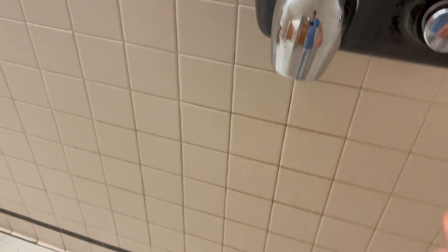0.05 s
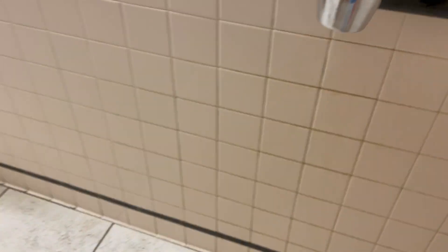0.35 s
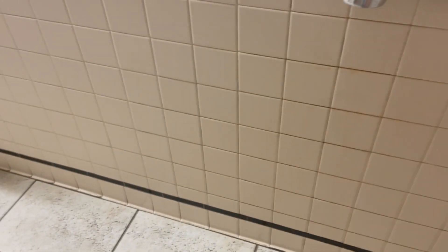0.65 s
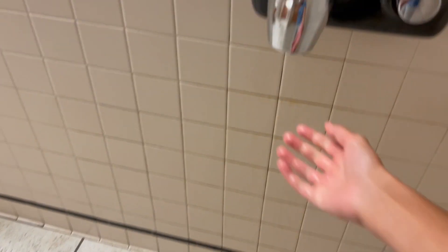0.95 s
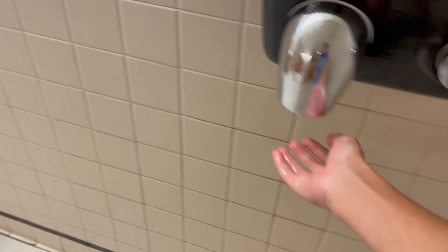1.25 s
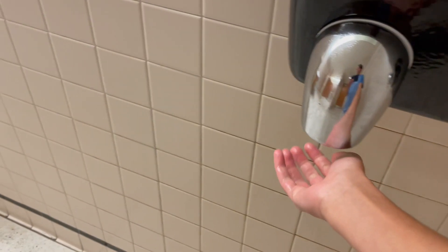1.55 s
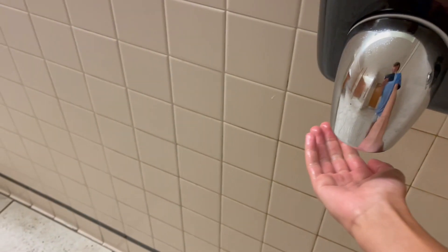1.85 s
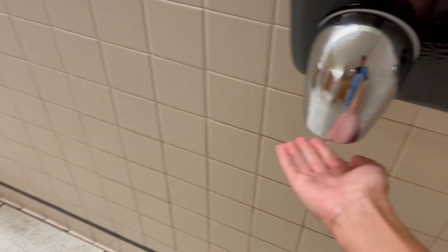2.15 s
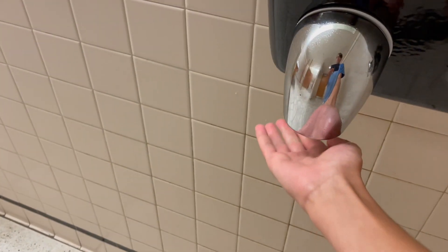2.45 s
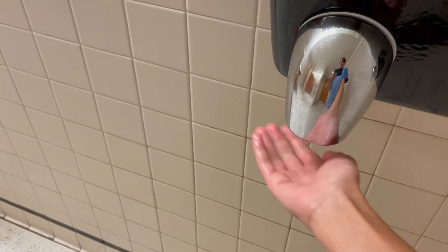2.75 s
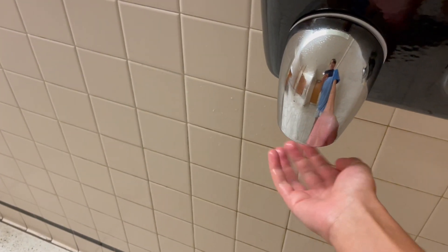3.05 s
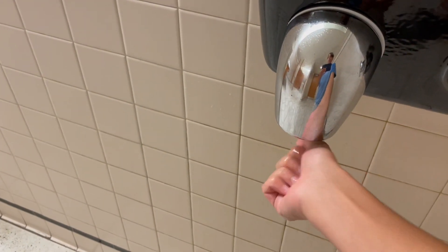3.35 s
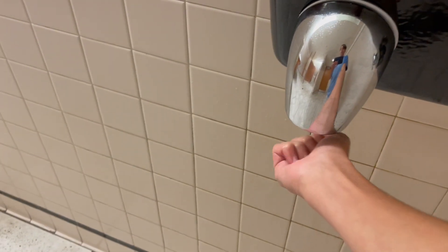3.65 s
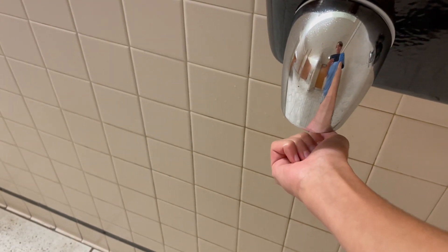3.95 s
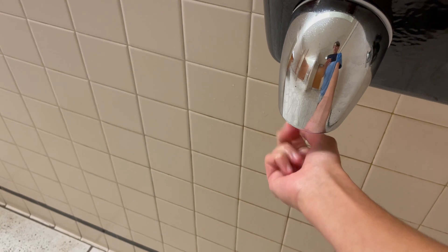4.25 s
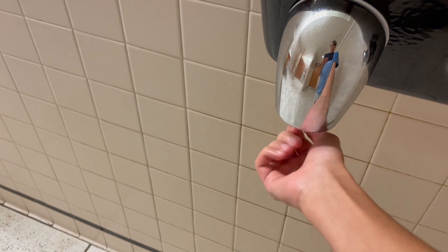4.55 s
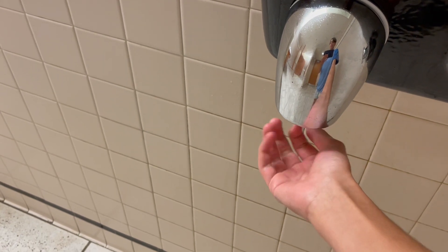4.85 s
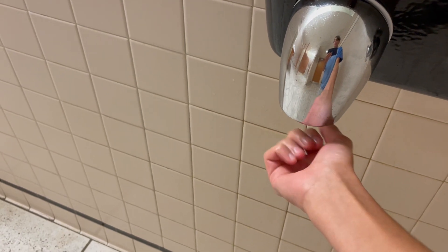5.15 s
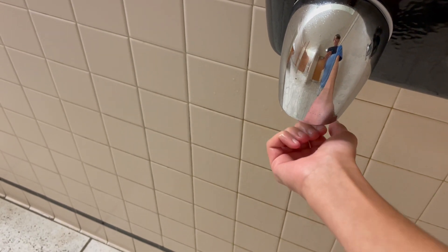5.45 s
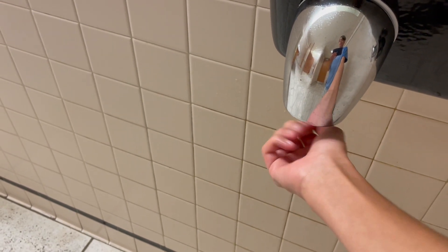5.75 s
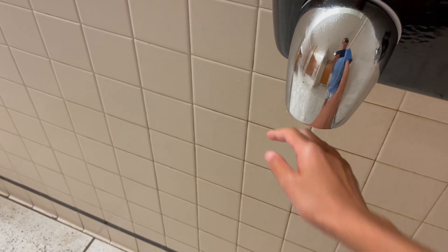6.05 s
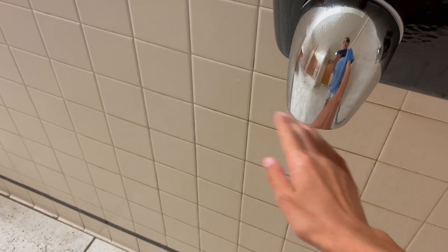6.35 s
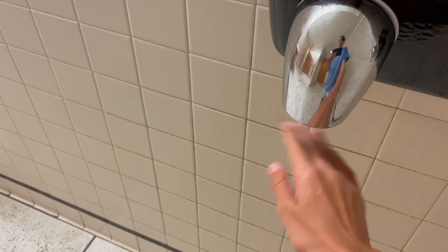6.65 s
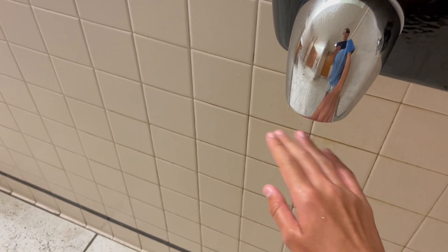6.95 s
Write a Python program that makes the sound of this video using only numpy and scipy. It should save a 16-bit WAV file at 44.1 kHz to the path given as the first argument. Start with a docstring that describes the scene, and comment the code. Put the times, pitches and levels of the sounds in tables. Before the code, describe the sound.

A wall-mounted hand dryer blows a loud, continuous rush of air for about seven seconds, heard in stereo from an arm's length away in a tiled restroom with a short reverberation. In the first half second the motor finishes spinning up: a brief low boom passes and a high whine rises, then holds its pitch, fluttering over a low hum. From about 1 second a hand enters the jet, and the roar and hiss shift subtly in colour, with a faint hollow note and a breathy whistle. The whine is strongest from about 1.5 to 6 seconds, with brief dips. The low drone recedes around 4 seconds and returns by 5.5. Just after 6 seconds the hand turns over and the hiss softens; the whine weakens around 6.6 while the air keeps blowing. Soft low puffs brush the microphone at the start and near 1.5 and 6.3 seconds.

```python
"""Hand dryer in a tiled restroom

A wall-mounted dryer finishes spinning up and blows into a hand. Turbulent air roars through the
housing and hisses over the fingers, changing colour as the hand cups, flattens, curls and turns.
The motor booms through a resonance of its mount, hums on its low shaft orders and whines on the 28th.
Two closely spaced microphones hear it from an arm's length away."""
import sys
import numpy as np
from scipy import signal
from scipy.fft import rfft, irfft
from scipy.io import wavfile

SR = 44100
rng = np.random.default_rng(int(sys.argv[2]) if len(sys.argv) > 2 else 0)


def wav_out(sig):
    """Save sig, one row per channel (or a flat mono array), as 16-bit PCM at SR to the path in sys.argv[1]."""
    wavfile.write(sys.argv[1], SR, np.round(np.clip(np.atleast_2d(sig).T, -1, 1) * 32767).astype(np.int16))


N = 317079
T = np.arange(N) / SR
F = np.maximum(np.fft.rfftfreq(N, 1 / SR), 1)
SIDES = np.array([[.5], [-.5]])  # splits a left-minus-right amount between the channels
FULL_HZ = 137.13  # shaft rate at full speed with a free outlet

# how alike the air sounds at the two microphones: (frequency [Hz], likeness [0-1])
STEREO_LIKENESS = [(50, .97), (200, .87), (380, .66), (520, .38), (900, .64), (1400, .48), (2100, .79),
                   (3500, .75), (4800, .82), (5900, .55), (7200, .985), (9000, .83), (11000, .92),
                   (14000, .8)]
# phase of the air between the microphones: (frequency [Hz], left lead [rad])
STEREO_LEAD = [(100, 0), (500, -.65), (900, -.2), (1400, -.75), (2500, .35), (3800, 0), (5200, -.05),
               (6100, -.95), (6700, -2.5), (7200, -3.14), (8000, -3.75), (10500, -6.1), (11700, -6.5),
               (13900, -9.4)]
# balance of the air: (frequency [Hz], left minus right [dB])
STEREO_TILT = [(60, .5), (110, -.3), (200, 2), (370, 1.3), (670, 1.2), (1230, .5), (2240, 1.8), (4100, 1.8),
               (6300, 1.8), (7500, .2), (13700, 0)]
# stray air hitting the microphones: (time [s], length [s], level [dB])
WIND_GUSTS = [(.12, 0.41, -40), (1.52, .15, -40), (6.292, 0.26, -38)]
# drone at four times the shaft rate, before its gain: (time [s], level [dB])
DRONE_LEVEL = [(0, -45), (.28, -29.5), (.6, -45), (.85, -45), (1.1, -35), (1.5, -34.5), (1.9, -49),
               (2.6, -46), (4, -61), (4.8, -46), (5.55, -35), (5.9, -38.5), (6.2, -33.5), (7.19, -33)]
# brief swells added to the drone, before its gain: (time [s], length [s], level [dB])
DRONE_SURGES = [(1.807, 0.089, -33), (2.03, .12, -37), (2.37, .11, -34), (2.91, 0.093, -36),
                (6.46, .2, -39)]
# the whine, strongest while the fingers are curled: (time [s], level [dB])
WHINE_LEVEL = [(0, -46), (.24, -36.5), (.38, -33), (.48, -37), (.62, -30.5), (.76, -36.5), (.97, -36),
               (1.07, -29.5), (1.26, -37), (1.35, -28.5), (1.6, -28), (1.8, -31.5), (2.15, -30.5),
               (2.7, -32), (3.1, -29), (3.5, -28.8), (3.9, -29.5), (4.35, -29), (4.65, -27), (5.05, -29.5),
               (5.4, -30), (5.77, -27.2), (6.05, -30.5), (6.4, -31.5), (6.62, -41), (7.19, -40)]
# brief dips in the whine: (time [s], length [s], change [dB])
WHINE_DUCKS = [(.455, .03, -12), (.515, 0.05, -12), (.69, .03, -7), (.765, .04, -9), (.855, .025, -8),
               (.94, 0.029, -8), (1.14, 0.045, -17), (1.275, .035, -11), (1.72, .12, -6.5), (3, .12, -5),
               (3.27, 0.14, -8), (4.02, 0.088, -8), (5.25, 0.097, -6), (6.22, 0.21, -8), (6.61, 0.1, -14)]
# the whine leans as the microphones move through its standing waves: (time [s], left minus right [dB])
WHINE_PAN = [(.3, 3.6), (1.5, 1.3), (2.5, .8), (3.65, 2.6), (4.3, -.9), (4.8, -1.3), (5.7, 0), (6.4, 1.8),
             (6.9, 3.5)]
# reflections of the whine off nearby walls: (delay [s], level [dB])
WALL_ECHOES = [(.029, -11), (.047, -9), (.074, -10), (.11, -11)]
# the hand comes in cupped, lies flat, curls into a fist, then turns over:
# (time [s], share of the jet blocked [0-1], cupping [0-1])
HAND_POSE = [(0, 0.01, 0.48), (.85, 0.02, 0.58), (1.15, 0.6, 0.6), (1.58, 0.81, 0.84), (1.95, 0.74, 0.38),
             (2.4, 0.96, 0.6), (3.2, 0.91, 0.63), (3.7, 0.71, 0.77), (4.2, 0.98, 0.8), (4.9, 0.58, 0.66),
             (5.3, 0.44, 0.58), (5.8, 0.28, 1), (6.25, 0.31, 0.06), (6.65, 0.48, 0.1), (7.19, 0.44, 0.13)]
# base spectrum of the turbulent air: (frequency [Hz], density [dB per Hz])
AIR_SPECTRUM = [(15, -88), (40, -72), (62, -60.5), (100, -58), (170, -52.5), (430, -53.5), (750, -53.5),
                (1100, -60), (1190, -59), (2000, -64.5), (3600, -66.5), (5300, -69.5), (11500, -76.5),
                (15500, -86.5)]
# resonances of housing, duct and nozzle: (frequency [Hz], width [Hz], lift [dB])
HOUSING_MODES = [(166, 9.3, 3), (204.4, 21, 4.5), (246, 6.2, 2), (284.3, 9, 4), (310, 17, -0.5),
                 (360, 28, 2.5), (508, 26, 2), (576, 12, 1.5), (640, 15, 1), (694, 13, 5.5), (755, 19, 1.5),
                 (788, 43, 5.5), (946, 59, 5), (1066, 18, 7.5), (1108, 23, 6.5), (1377, 27, 3.5),
                 (1488, 20, 6), (1693, 38, 5.5), (1928, 19, 4.5), (2100, 47, 5.5), (2230, 79, 3.5),
                 (2840, 394, 4.5), (3335, 62, 2.5), (3740, 150, 3.5), (4130, 130, 1.5), (4720, 180, 2),
                 (5290, 840, 4.5), (6320, 420, 4)]
# ring of the gap under the nozzle; ring_depth scales its swing about the mean: (time [s], contour [dB])
RING_CONTOUR = [(0, -32.5), (.65, -36), (1.08, -32), (1.4, -34.5), (1.7, -33.5), (2, -36), (2.36, -28),
                (2.8, -31.5), (3.28, -31.5), (3.5, -38), (3.85, -35.5), (4.02, -34), (4.2, -36.5),
                (4.5, -34), (4.65, -38.5), (5, -38), (5.17, -37), (5.7, -35), (5.98, -33.5), (6.2, -34),
                (6.45, -32.5), (7.19, -36)]
# hollow note of the space under the nozzle: (time [s], frequency [Hz], lift [dB])
CAVITY_NOTE = [(0, 1010, 6), (.45, 1045, 6), (.8, 990, 0.5), (1.2, 930, 3.5), (1.5, 990, 7.5),
               (1.8, 980, 4.5), (2.05, 930, 5.5), (2.35, 960, 6), (3.2, 960, 7), (3.6, 940, 6),
               (4.15, 945, 5), (4.45, 970, 6), (4.85, 968, 7), (5.4, 929.6, 5.5), (6.2, 940.6, 8.5),
               (6.5, 950, 3.5), (6.78, 934, 6), (7.19, 925, 1)]
# breathy whistle between nozzle and hand: (time [s], frequency [Hz], lift [dB])
GAP_WHISTLE = [(0, 2670, 3), (.5, 2760, 5), (1.1, 2930, 5), (1.8, 2890, 2), (2.35, 2860, 3.5),
               (2.65, 2880, 3.5), (2.8, 2880, 0.5), (3.25, 2860, 2.5), (3.549, 2840, 1.5),
               (3.78, 2870, 3.5), (3.99, 2880, 8), (4.2, 2930, 0), (5.2, 2840, 1.5), (5.74, 2824, 0),
               (5.86, 2900, 4.5), (6.07, 2910, 6.5), (6.2, 2950, 3), (6.36, 2920, 6), (6.85, 2940, 5),
               (7.19, 2950, 3)]
# passing peaks and dips as wall, palm and fingers get in the jet's way:
# (start [s], end [s], frequency [Hz], width [Hz], lift [dB])
JET_HOLLOWS = [(0.25, 1.02, 240, 56, 5.5), (1.1, 2, 175, 70, 2.5), (2.8, 3.7, 190, 70, 2),
               (0.1, 1.15, 128, 56, -17), (0, 1.22, 323, 84, -6), (0.4, 1.28, 1010, 100, 4),
               (0, 1.1, 1470, 60, 3), (0.4, 1.06, 1700, 70, 3.5), (0.2, 1.1, 2500, 100, 4.5),
               (.85, 1.33, 2600, 110, 3), (1.03, 1.5, 10000, 3500, 3), (1.2, 1.8, 5350, 650, 2),
               (1.5, 1.75, 6250, 350, 3.5), (1.3, 2.1, 2270, 150, -5), (1.5, 2, 6200, 400, -3),
               (1.7, 1.9, 895, 550, 2.5), (2, 3.35, 3470, 380, -5), (2.5, 3.9, 320, 250, -1.5),
               (2.82, 3.22, 11200, 2800, 4.5), (4, 4.27, 10500, 3000, 2), (4.3, 5.3, 10500, 3500, -1),
               (3, 4.05, 4260, 560, -3), (3.3, 4.1, 4800, 180, -2), (3.4, 4, 5850, 200, -3),
               (3.58, 4, 5570, 300, 5), (3.5, 4.35, 6280, 399.6, 3.5), (3, 4, 5300, 400, 3),
               (4, 4.404, 3300, 400, 3), (4.25, 5.85, 2430, 400, 4.5), (4.65, 5.048, 5280, 250, 3),
               (5, 5.4, 4900, 200, 4), (5, 5.82, 320, 180, -2.5), (5, 7.1, 730, 150, -2),
               (5.652, 6, 5400, 260.8, 3), (5.1, 6.5, 1105, 33, -4), (6.55, 7, 1105, 40, -5),
               (0, 1.75, 1105, 44, -3), (6.598, 7.2, 9880, 1510, 2)]
# how each band of the flow answers the hand: (no hand [dB], change if blocked [dB], change if cupped [dB])
RUMBLE, ROAR, HISS, SPRAY = (0, .65, -1.2), (0, 2.03, -2.34), (-3, .18, 4.93), (-.24, 1.7, .33)


def undb(db):
    """Decibels to gain."""
    return 10 ** (np.asarray(db) / 20)


def curves(table):
    """Each column of a time table as an automation curve."""
    times, *columns = np.transpose(table)
    return [np.interp(T, times, column) for column in columns]


def over_hz(table):
    """A (frequency, value) table drawn across the spectrum on a log axis."""
    hz, value = np.transpose(table)
    return np.interp(np.log(F), np.log(hz), value)


def bumps(table):
    """Sum of bell-shaped swells given as (time [s], length [s], height)."""
    return sum(height * np.exp(-(2 * (T - time) / length) ** 2) for time, length, height in table)


def wander(rate):
    """Smooth random modulation of spread 1 that changes about rate times a second."""
    drift = irfft(rfft(rng.standard_normal(N)) * np.exp(-.5 * (F / rate) ** 2), N)
    return drift / np.sqrt(np.mean(drift ** 2))


def stereo_pair(draw, likeness):
    """Left and right from independent mid and side draws, as alike as asked."""
    likeness = np.clip(likeness, 0, .995)
    mid = np.sqrt((1 + likeness) / 2) * draw()
    side = np.sqrt((1 - likeness) / 2) * draw()
    return np.array([mid + side, mid - side])


def echoes(rate, likeness):
    """Summed wall reflections of a tone: size and phase wander at each microphone."""
    return stereo_pair(lambda: (wander(rate) + 1j * wander(rate)) / np.sqrt(2), likeness)


def tiled_room(t60_s=.37, wet_db=-12):
    """Frequency response of the room: direct sound plus a dense tail that ripples the spectrum."""
    tail = rng.standard_normal(N) * undb(-60 * T / t60_s)
    wet = undb(wet_db)
    return (1 + wet * rfft(tail) / np.sqrt(np.sum(tail ** 2))) / np.sqrt(1 + wet ** 2)


def low_hum(hz=61.4, level_db=-47.5, waver_db=3.5):
    """A low wavering bed of hum under the blower."""
    return undb(level_db - waver_db * wander(5.9)) * np.sqrt(2) * np.sin(2 * np.pi * hz * T)


def wind_buffets(band_hz=(48.3, 90)):
    """Stray air hits the microphones in soft, low puffs."""
    bandpass = signal.butter(2, band_hz, "band", fs=SR, output="sos")
    wind = signal.sosfilt(bandpass, rng.standard_normal(N))
    return wind / np.std(wind) * bumps([(time, length, undb(db)) for time, length, db in WIND_GUSTS])


def mount_boom(shaft_hz, shaft_angle, mount_hz=128.4, width_hz=10.7, level_db=-26.5, echo_db=-12):
    """On the way up to speed the unbalanced rotor passes through a resonance of its mount."""
    response = 1 / (1 + (np.abs(shaft_hz - mount_hz) / (width_hz / 2)) ** 8)
    room = 1 + undb(echo_db) * echoes(rate=8, likeness=.9)
    return undb(level_db) * np.sqrt(2) * response * np.imag(room * np.exp(1j * shaft_angle))


def motor_hum(shaft_hz, shaft_angle, blocked, drone_gain_db=3, duct_hz=1128.6, duct_width_hz=23):
    """Low shaft orders, heard largely by way of the room; the first grows as the hand chokes the jet."""
    surges = bumps([(time, length, undb(db)) for time, length, db in DRONE_SURGES])
    drone = (undb(curves(DRONE_LEVEL)[0]) + surges) * undb(drone_gain_db)
    # the drone stands between the walls, so it reaches the left microphone 1.48 rad behind the right
    standing_wave = np.exp(-1.48j * SIDES) + undb(-14) * echoes(rate=14, likeness=.2)
    # the eighth order, a faint tone near 1.1 kHz, grows as the motor speeds up and the hand blocks the jet
    duct_skirt = 1 / np.hypot(1, 2 * (8 * shaft_hz - duct_hz) / duct_width_hz)
    orders = {1: undb(-41.5 + 7 * blocked) * echoes(rate=7.2, likeness=.19),
              2: undb(-46) * echoes(rate=6.8, likeness=1),
              4: drone * standing_wave,
              8: undb(-31) * duct_skirt * blocked * echoes(rate=7, likeness=.96)}
    tones = sum(gain * np.exp(1j * order * shaft_angle) for order, gain in orders.items())
    return np.sqrt(2) * np.real(tones)


def blade_whine(shaft_hz, shaft_angle, order=28, sway_db=.8, fringe_db=-14, fringe_below_hz=70):
    """The blades sing a fluttering, rough-edged tone that sways in the room's standing waves."""
    level_db = curves(WHINE_LEVEL)[0] + bumps(WHINE_DUCKS)
    sway = sway_db * stereo_pair(lambda: wander(5.6), likeness=.23)
    pan = curves(WHINE_PAN)[0] * SIDES
    # while the pitch glides, late echoes are at other pitches and beat against it
    gliding = np.sqrt(np.clip(FULL_HZ - shaft_hz, 0, 1))
    direct = np.exp(1j * order * shaft_angle)
    late = sum(undb(db) * np.exp(1j * order * np.interp(T - delay, T, shaft_angle))
               for delay, db in WALL_ECHOES)
    late_power = sum(undb(db) ** 2 for _, db in WALL_ECHOES)
    tone = (direct + gliding * late) / np.sqrt(1 + gliding ** 2 * late_power)
    flutter_depth = undb(-12 + 7 * gliding)
    flutter = (1 + flutter_depth * echoes(rate=28, likeness=.23)) / np.sqrt(1 + flutter_depth ** 2)
    # turbulence at the blades smears some of the tone into a band just below it
    fringe = undb(fringe_db) * echoes(rate=100, likeness=.46) * np.exp(-2j * np.pi * fringe_below_hz * T)
    return np.sqrt(2) * np.real((flutter + fringe) * tone) * undb(level_db + sway + pan)


def blower_spectrum():
    """Stereo spectrum of turbulence ringing the housing and the room."""
    housing_db = sum(db / (1 + (2 * (F - hz) / width) ** 2) for hz, width, db in HOUSING_MODES)
    colour_db = over_hz(AIR_SPECTRUM) + housing_db + SIDES * over_hz(STEREO_TILT)
    phase = np.exp(1j * SIDES * over_hz(STEREO_LEAD))
    noise = stereo_pair(lambda: rfft(rng.standard_normal(N)) * tiled_room(), over_hz(STEREO_LIKENESS))
    return noise * undb(colour_db) * phase * np.sqrt(SR / 2)


def air_jet(shaft_hz, blocked, cupped, flow_db_per_hz=.12, ring_hz=2870, ring_depth=.82):
    """Rumble, roar, hiss and spray follow motor speed and hand; the gap's ring rides its own contour."""
    spectrum = blower_spectrum()
    # five bands share the spectrum between them
    ring = np.exp(-.5 * ((F - ring_hz) / 290) ** 2)
    rumble = over_hz([(380, .47), (500, .036)])
    treble = over_hz([(2000, .1), (4300, .93)])
    spray = over_hz([(6500, .042), (9000, .8)])
    roar = (1 - ring) * (1 - treble - rumble)
    hiss = (1 - ring) * (treble - spray)
    speed_db = flow_db_per_hz * (shaft_hz - FULL_HZ)
    levels_db = [speed_db + free + block * blocked + cup * cupped
                 for free, block, cup in (RUMBLE, ROAR, HISS, SPRAY)]
    contour, = curves(RING_CONTOUR)
    levels_db.append(ring_depth * (contour - np.mean(contour)))
    bands = [rumble, roar, hiss, spray, ring]
    flutters_db = [.76, .76, .76, .92, .76]
    return sum(irfft(spectrum * band, N) * undb(db + flutter_db * wander(16))
               for band, db, flutter_db in zip(bands, levels_db, flutters_db))


def hand_cavity(rush, track, width_hz, waver_hz, waver_rate):
    """A narrow resonance of the rush that shifts and wavers as the hand moves."""
    hz, lift_db = curves(track)
    carrier = np.exp(2j * np.pi * np.cumsum(hz + waver_hz * wander(waver_rate)) / SR)
    pole = np.exp(-np.pi * width_hz / SR)
    # a moving band-pass: shift down to 0 Hz, smooth, shift back up
    band = 2 * np.real(carrier * signal.lfilter([1 - pole], [1, -pole], rush / carrier))
    return rush + (undb(lift_db) - 1) * band


def passing_hollows(rush):
    """Obstacles in the jet make resonances swell out of the rush and sink back; dips do the reverse."""
    shaped = rush
    for start, end, hz, width, lift_db in JET_HOLLOWS:
        progress = (T - start) / (end - start)
        swell = np.sqrt(np.clip(1 - (2 * progress - 1) ** 2, 0, 1))
        band = signal.lfilter(*signal.iirpeak(hz, hz / width, fs=SR), rush)
        shaped = shaped + (undb(lift_db * swell) - 1) * band
    return shaped


def scene(start_hz=121.3, spin_up_s=.212, choke_hz=.86, tremble_hz=.07):
    """The motor settles to full speed and runs a little faster against the hand; air and tones follow."""
    blocked, cupped = curves(HAND_POSE)
    shaft_hz = FULL_HZ + (start_hz - FULL_HZ) * np.exp(-T / spin_up_s) + choke_hz * blocked
    shaft_angle = 2 * np.pi * np.cumsum(shaft_hz + tremble_hz * wander(12)) / SR
    tones = blade_whine(shaft_hz, shaft_angle) + motor_hum(shaft_hz, shaft_angle, blocked)
    tones += mount_boom(shaft_hz, shaft_angle) + low_hum()
    rush = air_jet(shaft_hz, blocked, cupped)
    rush = hand_cavity(rush, CAVITY_NOTE, width_hz=70, waver_hz=5.6, waver_rate=3)
    rush = hand_cavity(rush, GAP_WHISTLE, width_hz=130, waver_hz=35, waver_rate=7.9)
    return wind_buffets() + tones + passing_hollows(rush)


def record(dry):
    """A steep low-pass trims the top above 14.3 kHz."""
    return signal.sosfilt(signal.ellip(10, .1, 80, 14300, fs=SR, output="sos"), dry)


dry = scene()
out = record(dry)
wav_out(out)
```